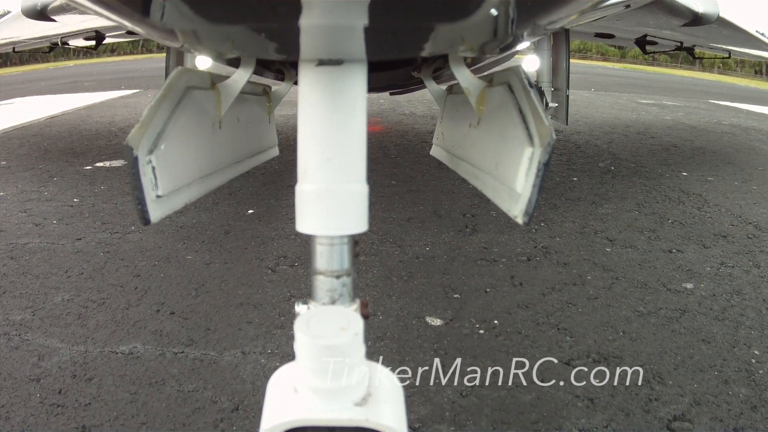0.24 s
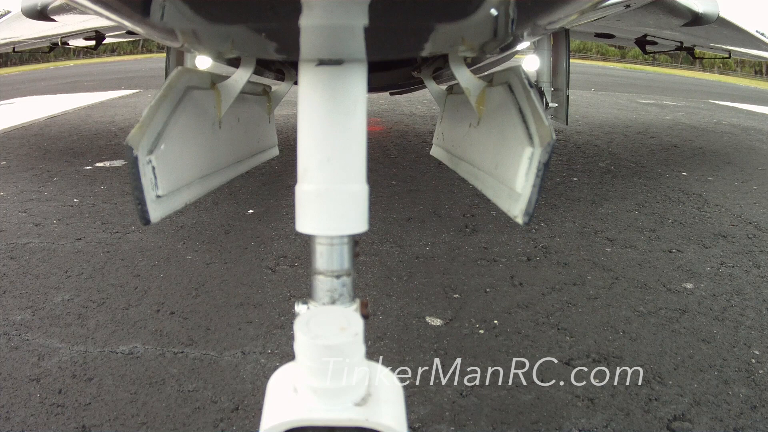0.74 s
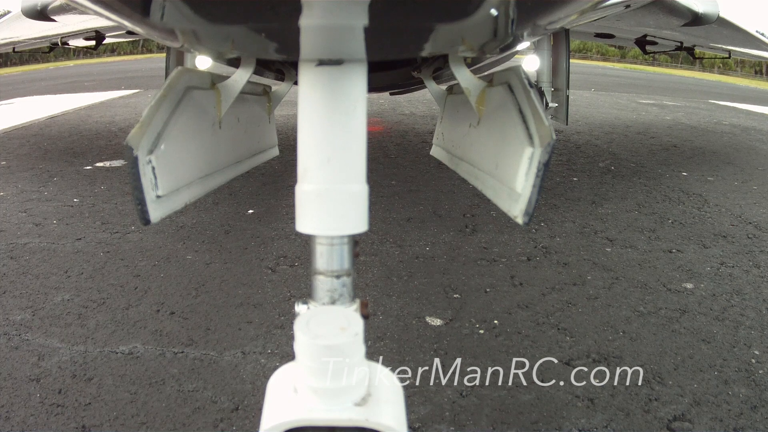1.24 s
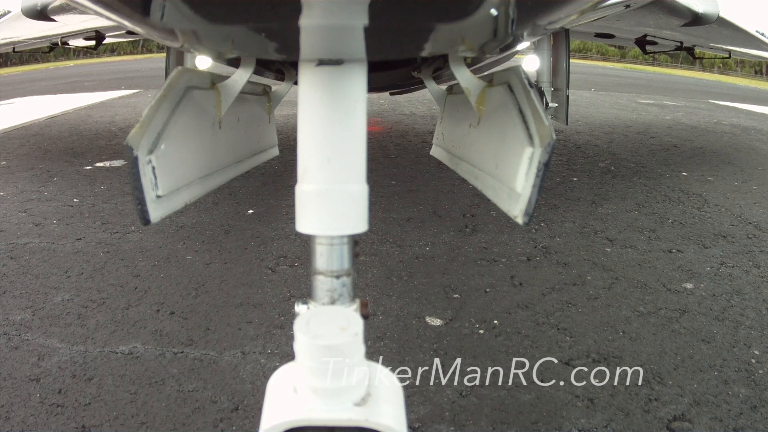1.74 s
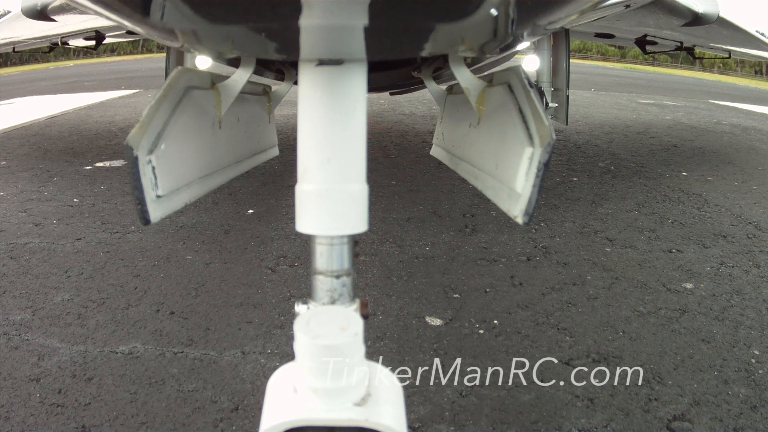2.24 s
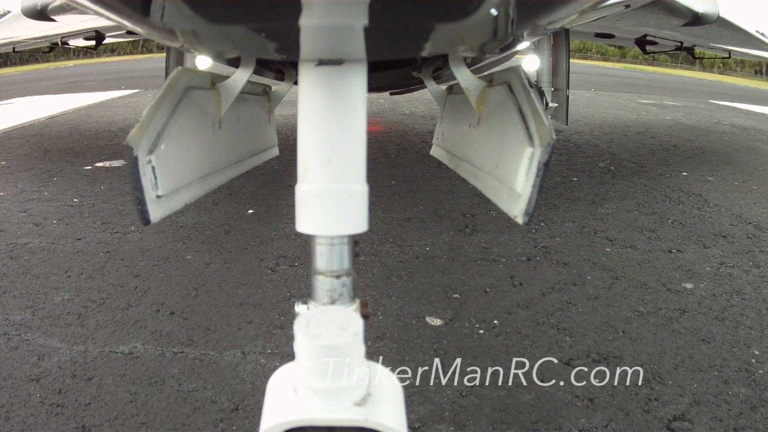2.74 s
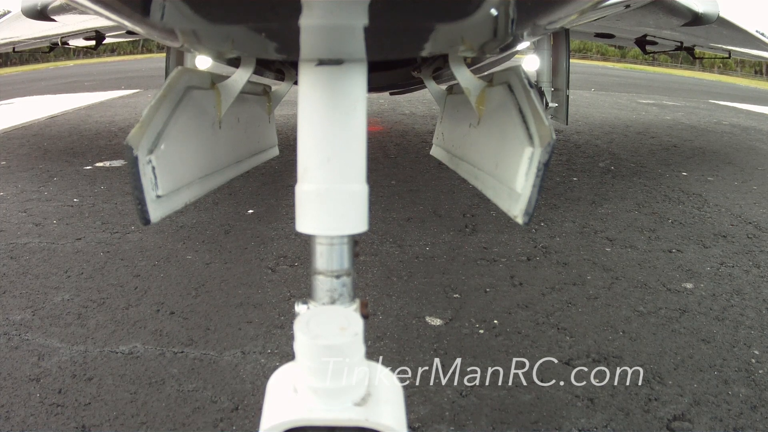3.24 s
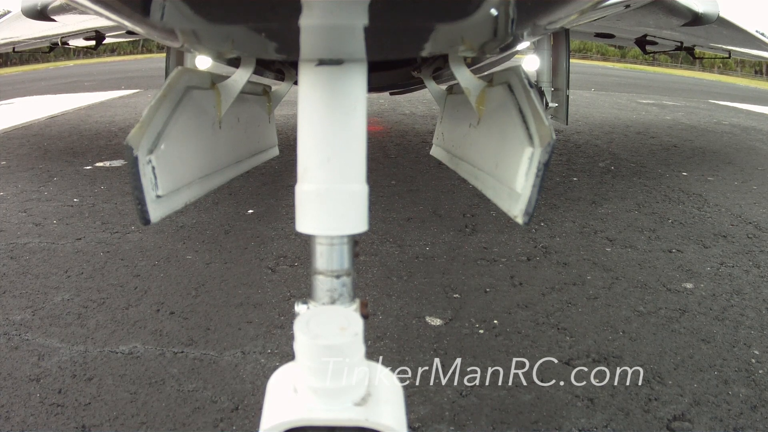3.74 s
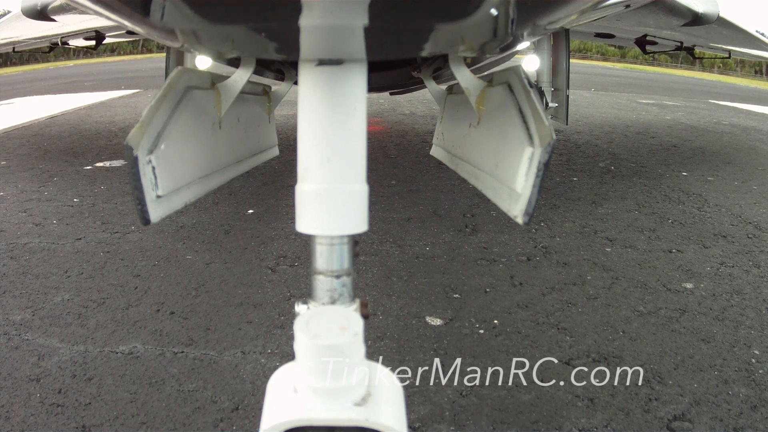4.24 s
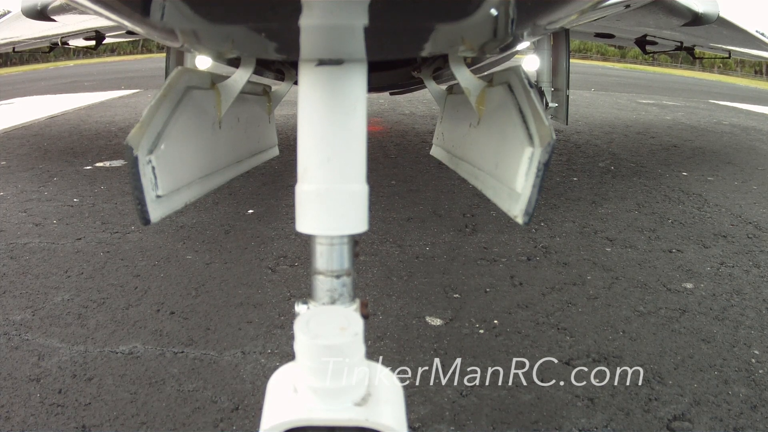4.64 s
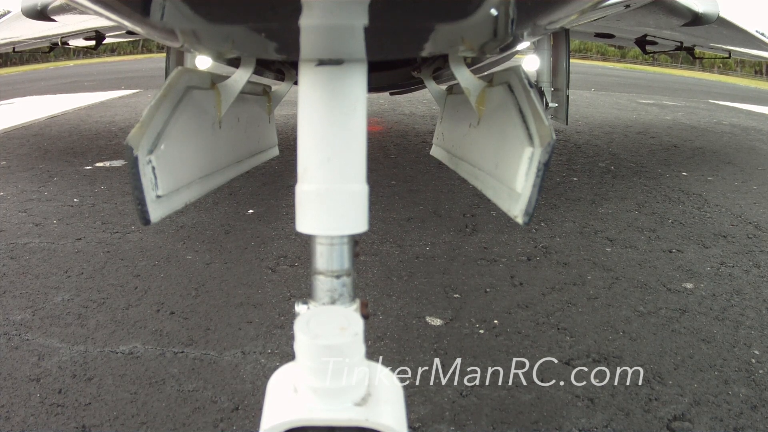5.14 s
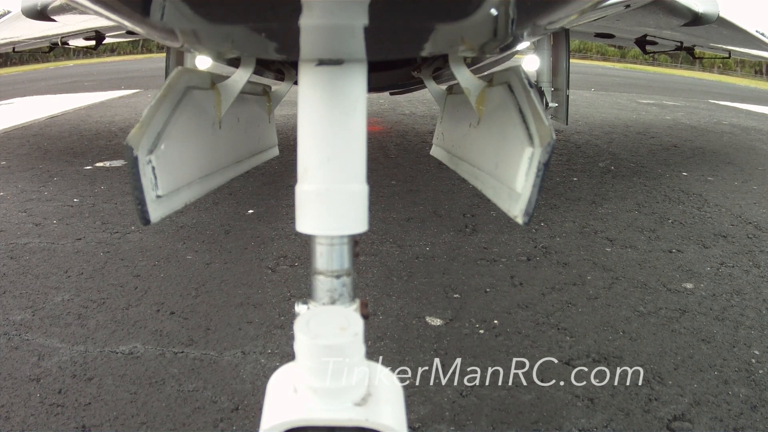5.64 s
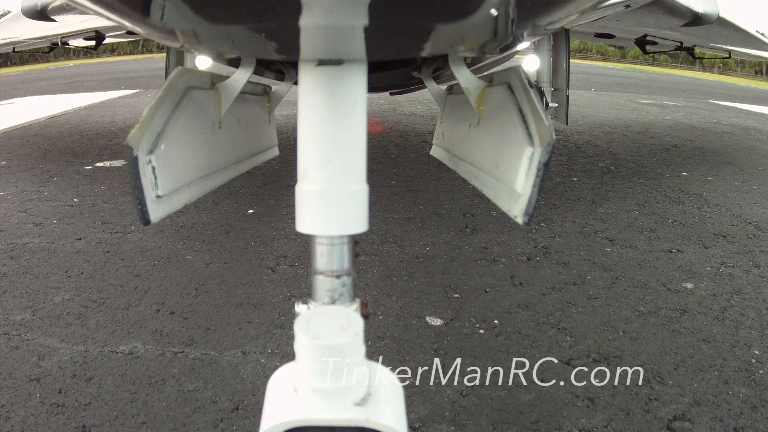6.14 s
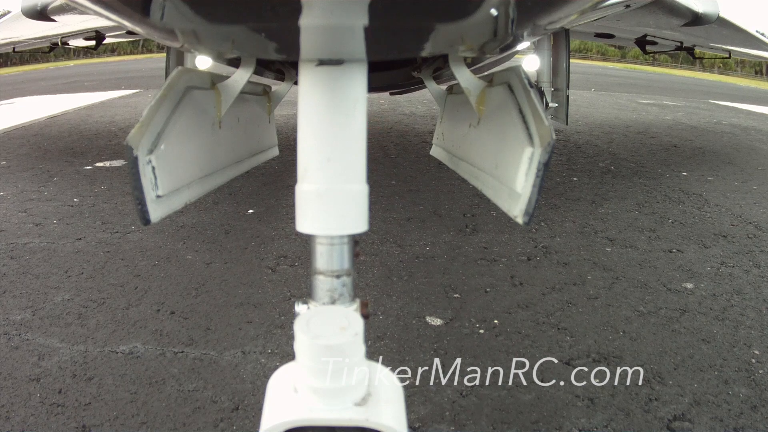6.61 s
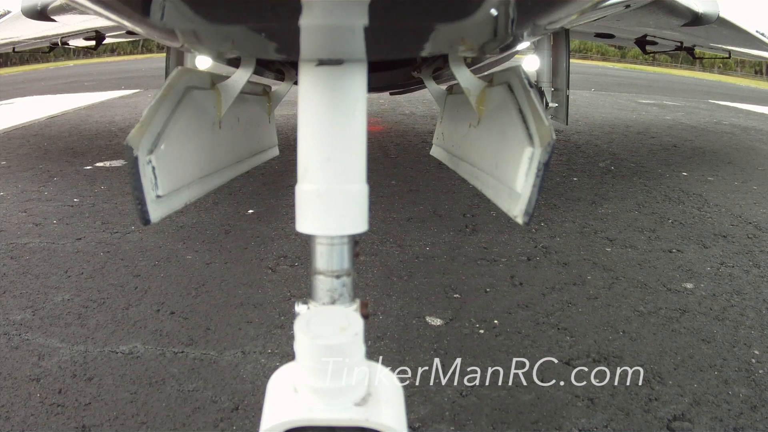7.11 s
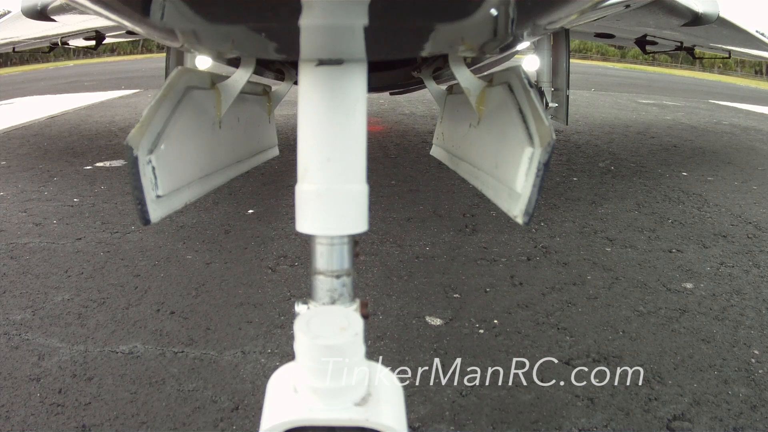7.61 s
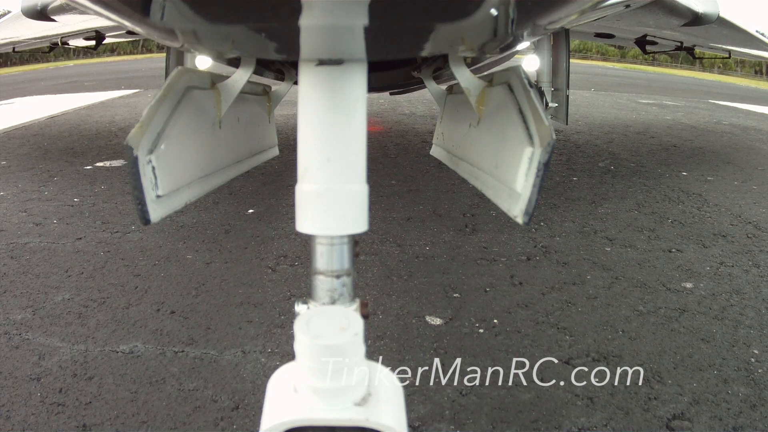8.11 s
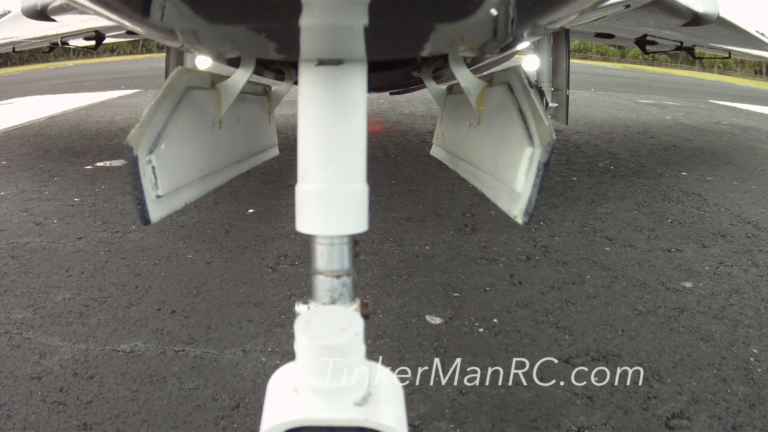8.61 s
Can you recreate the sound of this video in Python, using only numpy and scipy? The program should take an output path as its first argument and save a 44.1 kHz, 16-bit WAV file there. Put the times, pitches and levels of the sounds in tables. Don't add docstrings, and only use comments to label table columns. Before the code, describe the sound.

A small jet turbine idles very close with a steady hollow rush and thin whine, then spools up, its whistle climbing as the sound briefly ducks.

```python
import sys
import numpy as np
from scipy import signal
from scipy.fft import rfft, irfft, next_fast_len
from scipy.io import wavfile
from scipy.ndimage import uniform_filter1d

SR = 44100
rng = np.random.default_rng(int(sys.argv[2]) if len(sys.argv) > 2 else 0)


def volts(x):
    e = np.asarray(x, float) / 20
    return 10 ** e


def persist_wave(psi):
    counts = np.round(np.clip(psi, -1, 1) * 32767).astype(np.int16)
    wavfile.write(sys.argv[1], SR, np.atleast_2d(counts).T)


N = 391166
IDLE_HZ = 775


def curve(table, t):
    s, *columns = np.transpose(table)
    return [np.interp(t, s, c) for c in columns]


def bell(hz, centre, width):
    return np.exp(-.5 * ((hz - centre) / width) ** 2)


def bells(hz, table):
    return sum(db * bell(hz, centre, width) for centre, width, db in table)


def drift(shape, size):
    x = uniform_filter1d(rng.standard_normal(shape), size, axis=0)
    x = uniform_filter1d(x, size, axis=0)
    return x / np.sqrt(np.mean(x ** 2))


# time in seconds, shaft acceleration in turns per second per second.
FUEL_PUSH = [(0, 6.1), (.4, .5), (1.16, 15.2), (2.13, -5.0), (2.46, 1.0), (2.84, -15.5), (3.66, .6),
             (4.15, 2.9), (4.61, 15.7), (4.94, 2.0), (6.23, -9.5), (6.86, -2.9), (7.07, 55.1), (7.23, 94.2),
             (7.63, 160.4), (8.09, 182.5), (8.31, 158.9), (8.87, 101.6)]


def shaft(t):
    start_hz = 768.5
    clock = np.arange(N) / SR
    speed = start_hz + np.cumsum(curve(FUEL_PUSH, clock)[0]) / SR
    hz = np.interp(t, clock, speed)
    return hz, np.clip((hz - IDLE_HZ) / 200, 0, 1)


# frequency in Hz, level in dB.
RUSH_COLOUR = [(25, -38.8), (80, -29.6), (140, -15.0), (300, -12.6), (480, 0.0), (1400, -16.8),
               (2400, -4.6), (4300, -12.2), (5400, -10.0), (8200, -29.3), (8950, -46.1), (9500, -31.3),
               (11500, -18.4), (15300, -13.8)]
# centre in Hz, width in Hz, level in dB.
BODY_COLOUR = [(195, 22, -4.0), (267, 10, -2.1), (430, 29, 4.3), (584, 27, 3.6), (860, 93, 9.6),
               (875, 50, -12.1), (1050, 55, 7.3), (1128, 20, -5.4), (1184, 84, 5.6), (1482, 64, 5.7),
               (1970, 23, -4.0), (2485, 95, -6.2), (2910, 57, 5.8), (2950, 173, -11.6), (3528, 212, -6.0),
               (3698, 49, -5.1), (4215, 177, -4.5), (4436, 73, -7.2), (4884, 47, 2.9), (5314, 82, 2.7),
               (6603, 204, 4.2), (7205, 82, 4.1), (7634, 76, 2.8), (9849, 197, -5.7), (10700, 402, -7.6),
               (14959, 347, -2.0)]
# centre in Hz, width in Hz, level at high speed in dB.
THRUST_COLOUR = [(1986, 48, 6.5), (2190, 150, -3), (2650, 130, 0.5), (3220, 300, 1.5), (4620, 120, -7.5),
                 (5300, 340, -3), (8040, 390, 5)]
# centre in Hz, width in Hz, level in dB.
TOP_SPEED_COLOUR = [(4460, 70, 1), (4850, 200, -3.5), (7400, 630, -5.5), (10600, 670, 3)]
# shaft order, width in Hz, level in dB.
BLADE_HEAPS = [
    (6.5, 400, 1.5),
    (12, 820, 1),
    (18, 680, 4),
]


def rush_colour(hz, speed, thrust):
    knots_hz, knots_db = np.transpose(RUSH_COLOUR)
    colour = np.interp(np.log(hz + 1), np.log(knots_hz), knots_db)
    colour = colour + bells(hz, BODY_COLOUR)
    colour = colour + np.sqrt(thrust) * bells(hz, THRUST_COLOUR)
    colour = colour + thrust ** 2 * bells(hz, TOP_SPEED_COLOUR)
    for order, width, db in BLADE_HEAPS:
        colour = colour + db * (bell(hz, order * speed, width) - bell(hz, order * IDLE_HZ, width))
    main = (hz > 150) & (hz < 4200)
    return colour - 10 * np.log10(np.sum(volts(colour[:, main]) ** 2, 1, keepdims=True))


def rush():
    patchy_db, gust_db = .29, .5
    roar_db, roar_hz, dull_db, hiss_db = 1.2, 1300, -1.0, 1
    frames, hz = N // 512 + 5, np.fft.rfftfreq(2048, 1 / SR)
    t = np.arange(frames) * 512 / SR
    speed, thrust = (v[:, None] for v in shaft(t))
    rich = bell(thrust, .22, .16) * np.minimum(thrust / .05, 1)
    roar = roar_db * rich * (hz < roar_hz)
    hiss = (hiss_db * thrust ** 2 + dull_db * rich) * (hz > 9000)
    patches = uniform_filter1d(drift((frames, len(hz)), size=5), size=30, axis=1)
    gusts = drift((frames, 1), size=4) * np.clip(hz / 4000, 0, 1)
    level_db = rush_colour(hz, speed, thrust) + roar + hiss
    level_db = level_db + patchy_db * patches / patches.std() + gust_db * gusts
    z = rng.standard_normal((frames, len(hz), 2)) @ [1, 1j]
    flat = signal.istft(z.T, nperseg=2048, noverlap=1536)[1]
    bin_rms = flat.std() / np.sqrt(len(hz))
    noise = signal.istft((z * volts(level_db)).T, nperseg=2048, noverlap=1536)[1][:N]
    return noise / bin_rms * volts(gain_db(np.arange(N) / SR))


# centre in Hz, width in Hz, level in dB.
CAVITY_MODES = [(30, 40, -3), (108, 5, 2), (119, 4, -4), (135, 8, 3), (153, 4, -7), (166, 6, 3),
                (200, 14, -2), (264, 8, -3), (352, 10, -2), (441, 18, 0.3), (620, 40, 0.8), (655, 14, -4),
                (740, 14, -2), (1128, 14, -3), (2280, 40, 1.5), (3000, 25, -2.5), (3700, 25, -2.5)]


def hollow(x):
    size = next_fast_len(len(x), True)
    hz = np.fft.rfftfreq(size, 1 / SR)
    return irfft(rfft(x, size) * volts(bells(hz, CAVITY_MODES)), size)[:len(x)]


SHAFT_ORDERS = [6, 12, 18, 5, 13, 14, 15, 16, 1]
# shaft speed in turns per second, level in dB.
FIRST_BLADE_TONE = [(773, -40.5), (781, -44), (815, -41), (880, -37), (910, -46), (925, -52), (945, -42),
                    (1030, -44)]
SECOND_BLADE_TONE = [(773.3, -67), (775.2, -56), (781, -52), (790, -44), (860, -38.5), (910, -40),
                     (945, -22.5), (1030, -18.5)]
THIRD_BLADE_TONE = [(773, -41), (775.5, -50), (779, -54), (781.5, -48), (790, -36), (798, -40), (813, -30),
                    (850, -31)]
# level in dB at idle, at thrust 0.3, at full thrust.
UNEVEN_BLADES = [
    (-48, -60, -58),
    (-70, -58, -43),
    (-68, -59, -51),
    (-51, -58, -42.5),
    (-57, -59, -53),
]
# centre in Hz, width in Hz, level in dB.
INTAKE_WAVES = [(5060, 45, -14), (5810, 35, -20), (9560, 30, -5), (9800, 110, -7), (10440, 40, -4),
                (10740, 80, -6), (11050, 40, -8), (11520, 45, -8), (12040, 70, -3), (12290, 35, 5),
                (11850, 90, 1.5), (13010, 50, 7), (13220, 80, -20)]


def whistle():
    waver_db, fade_db, strain_db = 1.2, 3, .8
    slip, blur = .00032, .32
    steady = .65
    idle_gain_db, shaft_db = -24.5, -47
    t = np.arange(N) / SR
    coarse = t[::100]
    hz, thrust = shaft(coarse)
    speed = shaft(t)[0] * (1 + slip * drift(N, size=500))
    turns = 2 * np.pi * np.cumsum(speed) / SR
    gulp_db = -18 * bell(coarse, 7.04, .06)
    levels = [curve(FIRST_BLADE_TONE, hz)[0]]
    levels += [curve(tone, hz)[0] + gulp_db for tone in (SECOND_BLADE_TONE, THIRD_BLADE_TONE)]
    levels += [np.interp(thrust, [0, .3, 1], row) for row in UNEVEN_BLADES]
    levels += [shaft_db - 40 * thrust]
    depths = [waver_db] * 3 + [fade_db] * 6
    gain = gain_db(coarse) - idle_gain_db
    out = np.zeros(N)
    for order, db, depth in zip(SHAFT_ORDERS, levels, depths):
        db = db + bells(order * hz, INTAKE_WAVES) + gain
        waver = depth * drift(len(hz), size=5) + strain_db * drift(len(hz), size=30)
        db = db + (1 - steady * thrust * (order == 12)) * waver
        phase = order * turns + np.interp(t, coarse, blur * drift(len(hz), size=7))
        out += np.interp(t, coarse, volts(db)) * np.cos(phase)
    return np.sqrt(2) * out


# shaft order, middle in seconds, half length in seconds, level in dB.
FOLDED_TONES = [
    (54, 8.12, .038, -35),
    (48, 8.145, .03, -45),
    (36, 8.83, .06, -50),
]


def folded_chirps():
    sampler_hz = 48000
    t = np.arange(N) / SR
    turns = 2 * np.pi * np.cumsum(shaft(t)[0]) / SR
    out = np.zeros(N)
    for order, middle, half, db in FOLDED_TONES:
        window = np.cos(np.pi / 2 * np.clip((t - middle) / half, -1, 1))
        out += volts(db) * window * np.cos(order * turns - 2 * np.pi * sampler_hz * t)
    return np.sqrt(2) * out


# shaft speed in turns per second, rush level in dB.
SQUEEZED_GAIN = [(770, -25), (781, -24.4), (812, -24), (862, -24.6), (915, -29.5), (965, -29.7),
                 (1030, -29)]
# time in seconds, depth in dB, fall
# in seconds, recovery in seconds.
GAIN_DUCKS = [
    (8.11, -7.5, .015, .07),
    (8.83, -5.5, .03, .03),
    (4.37, -1, .15, .3),
]


def gain_db(t):
    ducks = sum(db * np.exp(-np.maximum((s - t) / fall, (t - s) / recovery))
                for s, db, fall, recovery in GAIN_DUCKS)
    return curve(SQUEEZED_GAIN, shaft(t)[0])[0] + ducks


def scene():
    return np.tile(hollow(rush()) + whistle() + folded_chirps(), (2, 1))


# edge in Hz, wander in Hz.
DEAD_EDGES = [
    (8755, 55),
    (9185, 35),
    (15290, 20),
]


def dead_band(x):
    hz, t, z = signal.stft(x, SR, nperseg=2048, noverlap=1536)
    low, high, top = (edge + wander * drift(len(t), size=2) for edge, wander in DEAD_EDGES)
    hz = hz[:, None]
    z = z * ((hz < low) | (hz > high)) * (hz < top)
    return signal.istft(z, SR, nperseg=2048, noverlap=1536)[1][:N]


def top_cut(x):
    return signal.sosfilt(signal.butter(12, 15430, fs=SR, output="sos"), x)


def record(dry):
    mix = np.tile(dead_band(dry[0]), (2, 1))
    return top_cut(mix)


dry = scene()
out = record(dry)
persist_wave(out)
```